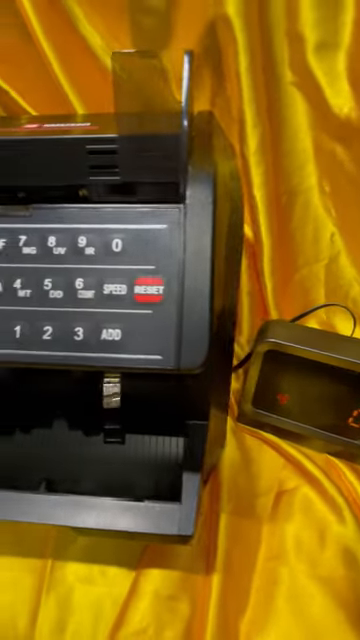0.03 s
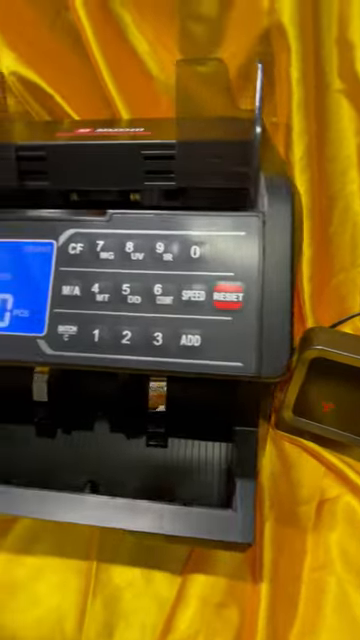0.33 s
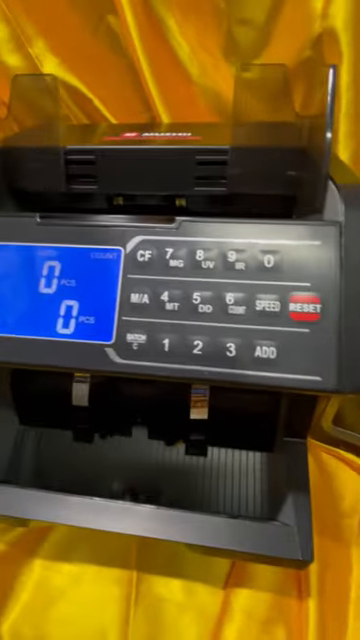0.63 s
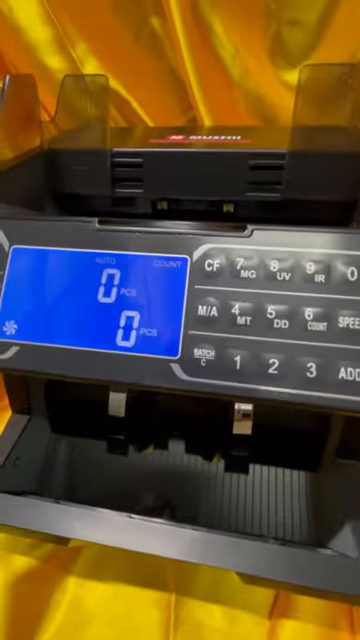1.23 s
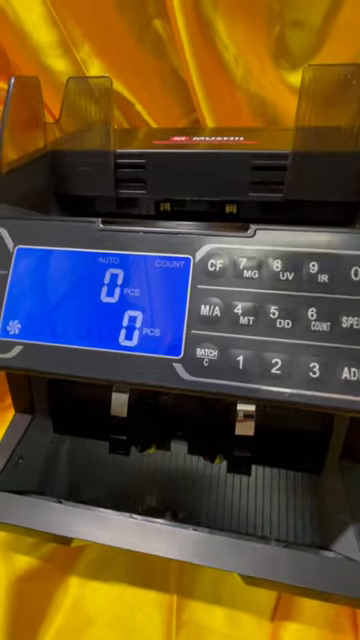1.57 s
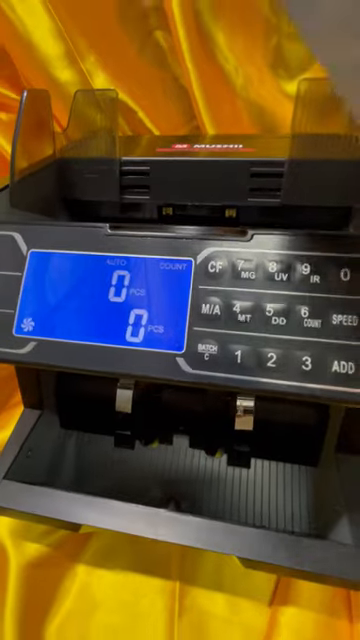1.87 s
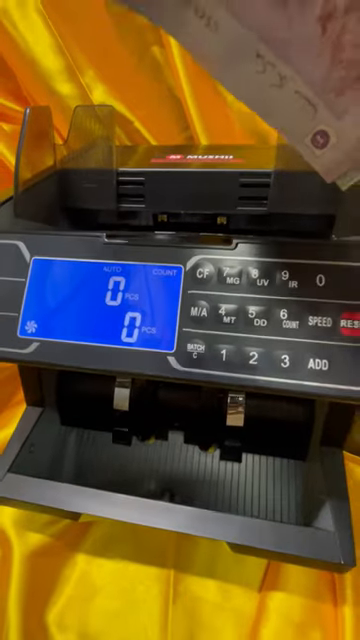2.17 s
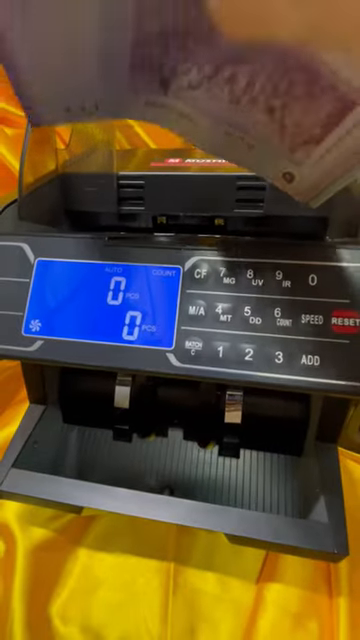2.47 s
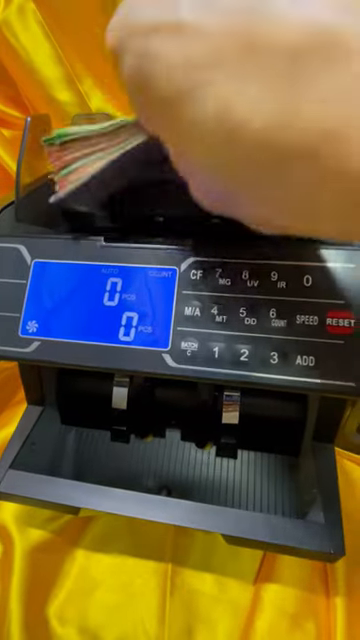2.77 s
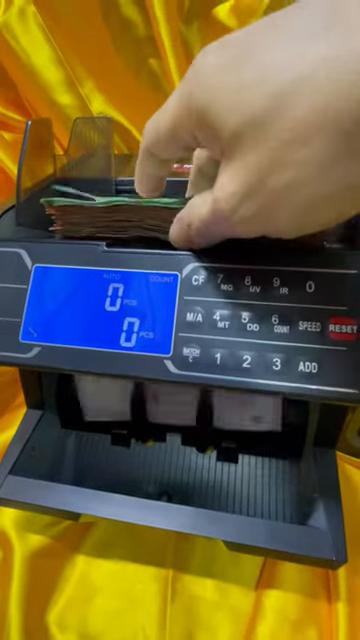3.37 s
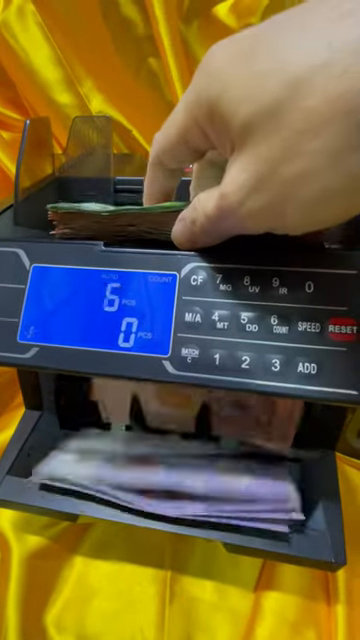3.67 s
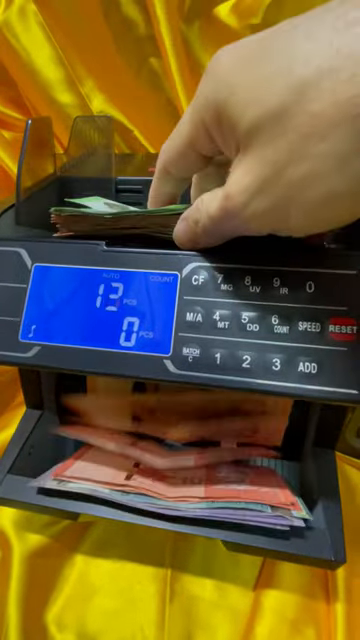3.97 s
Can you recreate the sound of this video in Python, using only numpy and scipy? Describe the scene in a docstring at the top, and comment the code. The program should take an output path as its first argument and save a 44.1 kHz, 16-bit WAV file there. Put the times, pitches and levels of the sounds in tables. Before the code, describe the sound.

A banknote counter is loaded and runs, heard close up. At first there is only a low room hum and faint handling swishes. From about 2.7 seconds a paper stack rustles in with light ticks and bumps. Rollers scrape at 3.2 seconds, then from 3.3 until the end at 4 the machine loudly riffles notes in rapid pulses, its motor whirring and plastic case rattling.

```python
"""A banknote counter plucks about 22 notes a second off a stack. Each note knocks in the plastic
case, rushes through the rollers and slaps into the tray, while the motor whirs and the case rattles.
The counting fills the last two thirds of a second. Before it come soft swishes of handling, then
the stack slides into the hopper and the rollers scrape it. The room is quiet, with a low hum.
Two close microphone openings, called ports, hear the machine as left and right."""
import sys
import numpy as np
from scipy import signal
from scipy.fft import rfft, irfft
from scipy.io import wavfile

SR = 44100
rng = np.random.default_rng(int(sys.argv[2]) if len(sys.argv) > 2 else 0)


def log_audio(samples):
    """Write samples as a 16-bit WAV file to the path given in sys.argv[1]."""
    # one column per channel
    frames = np.atleast_2d(samples).T
    # limit to full scale, then quantise
    limited = np.clip(frames, -1, 1)
    pcm = np.round(limited * 32767).astype(np.int16)
    wavfile.write(sys.argv[1], SR, pcm)


N = 176400
T, HZ = np.arange(N) / SR, np.fft.rfftfreq(N, 1 / SR)

# Notes plucked off the stack. Each row: start in seconds, relative level in dB, bass boost in dB,
# favoured pitch in Hz, contact time as a multiple of the usual.
PLUCKS = [(3.3445, -5, -4, 2000, 1.2), (3.3915, 4.5, 4, 740, .9), (3.4505, 3, -1, 800, 1.2),
          (3.503, 1.5, 1, 800, 1), (3.5505, 4, 0, 875, 1.4), (3.582, -3, -5, 1750, 1),
          (3.597, .5, 2, 840, .8), (3.6515, 1.5, -1, 650, 1), (3.711, -1.5, 0, 830, 1.6),
          (3.7555, 2, 3, 760, 1), (3.7945, .5, 0, 780, .9), (3.8365, .5, -2, 840, 1.1),
          (3.878, 0, -3, 1650, .9), (3.921, 2, -6, 865, 1.2), (3.978, -.5, -4, 850, 1)]
# How much louder the left port is than the right. Each row: frequency in Hz, difference in dB.
LEFT_GAIN = [(70, -3), (280, -4.5), (450, -1), (620, -12.5), (860, -10.5), (1100, -5), (1800, -5.5),
             (2300, -0.5), (4000, -7.5), (5200, 3.5), (6500, -1), (15000, 0)]
# How far the wave at the left port is ahead. Each row: frequency in Hz, lead in radians.
LEFT_LEAD = [(170, -0.1), (350, 0.02), (520, -2), (700, -3.5), (900, -6), (1200, -4), (1750, -6.5),
             (2800, -2), (4600, -2.5), (5900, -5), (7000, -4.5), (9000, -4.5), (11500, -2.5), (14300, 1.8)]


def case_knocks(blows):
    """Each blow pushes the plastic case for a few milliseconds, then its tones ring out."""
    # The case's tones. Each row: pitch in Hz, relative level in dB, time pushed in seconds,
    # seconds to fade by 60 dB, gain at the left port in dB.
    case_tones = [(285, -29, .005, .05, -4), (340, -31, .005, .03, -4), (450, -31, .005, .025, -6),
                  (610, -19.5, .003, .02, -12), (765, -18.5, .0045, .012, -17), (860, -15, .005, .012, -20),
                  (895, -26, .005, .05, -15), (1070, -25, .003, .02, -6), (1270, -24, .0015, .012, -9),
                  (1620, -18.5, .002, .01, -7), (1790, -20, .0025, .014, -7), (1980, -25, .002, .012, -5)]
    rise_s, detune, bass_below_hz = .0003, .012, 500
    favour_db, favour_width = 4, .08
    out, t = np.zeros((2, N)), T[:SR // 8]
    for start, db, bass_db, favoured_hz, contact in blows:
        for hz, tone_db, pushed_s, t60_s, left_db in case_tones:
            favour = np.exp(-(np.log(hz / favoured_hz) / favour_width) ** 2)
            boost_db = bass_db * (hz < bass_below_hz) + favour_db * favour
            fade_db = 60 * np.maximum(t - pushed_s * contact, 0) / t60_s
            level = np.minimum(t / rise_s, 1) * amp(db + tone_db + boost_db - fade_db)
            phase = 2 * np.pi * hz * (1 + detune * rng.standard_normal()) * t + rng.uniform(-1.18, 1)
            add(out, start, -level * stereo_tone(phase, hz, left_db))
    out = signal.lfilter(*signal.iirnotch(975, Q=9, fs=SR), out)  # the case barely rings at 975 Hz
    return signal.lfilter(*signal.butter(2, 140, "high", fs=SR), out)


def paper_rush():
    """Notes rush through the rollers, swelling at each pluck and echoing inside the paper path."""
    # The flow of paper. Each row: time in seconds, relative level in dB.
    flow = [(3.3, -65), (3.328, -17), (3.345, 2), (3.385, -1), (3.41, 3), (3.5, 0.5), (3.675, 2),
            (3.69, -5), (3.71, 3), (3.73, 1), (3.82, -0.5), (3.89, 1.5), (3.955, -3), (4, -1.5)]
    # The tone of the rush. Each row: frequency in Hz, level in dB per Hz.
    spectrum = [(100, -91), (400, -59.5), (880, -53.5), (975, -70), (1060, -56), (1350, -64), (1750, -58),
                (2150, -66), (2600, -59.5), (4400, -64.5), (5400, -62.5), (7000, -68.5), (9000, -69),
                (11000, -79.5), (13500, -71.5), (16000, -80.5)]
    level = loudness_curve(flow) * np.sqrt(gaps())
    swell = amp(-1) * pluck_pulses(decay_s=.024)
    hiss = grainy(flutter_db=1, flutter_hz=172, grain_db=1.5)
    rush = unit_level(hiss + amp(-2) * crinkles()) * level * np.hypot(1, swell)
    echo_gain = amp(-7)
    rush = rush + echo_gain * echoes(rush, t60_s=.032, rise_s=.00057)
    return ports(rush / np.hypot(1, echo_gain), spectrum)


def tray_slaps():
    """Notes slap into the tray, each a rough burst of noise with its own brief ring."""
    # Each row: time of the peak in seconds, relative level in dB, half-length in seconds, ring in Hz.
    slaps = [(3.346, 4, 0.0035, 2040), (3.377, 0.5, 0.011, 4900), (3.418, 5.5, 0.0025, 5700),
             (3.42, 2.5, 0.0032, 3240), (3.442, 5, 0.0027, 4970), (3.4655, 7, 0.0027, 6200),
             (3.482, 5.5, 0.0077, 3250), (3.536, 3, .004, 3550), (3.61, 3, 0.0025, 5780),
             (3.626, -1, .006, 3000), (3.658, 2.5, .003, 8000), (3.67, 5.5, 0.0027, 1760),
             (3.735, 5, 0.0036, 5100), (3.775, 0, .002, 2680), (3.812, -2, 0.0052, 5176),
             (3.85, -0.5, 0.0019, 2896), (3.869, 7, 0.0016, 5300), (3.9, 1, 0.0043, 2901)]
    # The tone all slaps share. Each row: frequency in Hz, level in dB per Hz.
    spectrum = [(50, -100), (200, -76), (1000, -71.5), (2000, -59), (3000, -62.5), (4400, -60),
                (5500, -64.5), (7000, -63), (9000, -73), (13000, -68), (16000, -82)]
    ring_db, ring_width_hz = 9, 940
    out, t = np.zeros((2, N)), T[:SR // 10]
    for peak_s, db, half_s, hz in slaps:
        noise = rng.standard_normal((2, len(t)))
        rough_level = amp(db - 5 + 3.05 * rng.standard_normal(len(t)))
        burst = noise * rough_level * np.exp(-.5 * ((t - t.mean()) / half_s) ** 2)
        ring = signal.lfilter(*signal.iirpeak(hz, hz / ring_width_hz, SR), burst)
        add(out, peak_s - t.mean(), burst + amp(ring_db) * ring)
    return ports(out, spectrum)


def motor_and_gears():
    """Rollers and gears rattle the case, hardest after each pluck, over the motor's wavering tones."""
    # The motor starts and runs. Each row: time in seconds, relative level in dB.
    run_levels = [(3.13, -57), (3.18, -37), (3.3, -22), (3.345, 0), (3.675, 4.5), (3.69, -15), (3.72, 3)]
    # The tone of the rattle. Each row: frequency in Hz, level in dB per Hz.
    rattle_spectrum = [(25, -105), (60, -84), (130, -73), (185, -58), (240, -56), (320, -53), (380, -56.5),
                       (480, -59.5), (600, -54), (700, -56), (870, -53), (980, -66), (1100, -58),
                       (1400, -70), (1800, -58), (2100, -72), (5000, -90)]
    # The motor's tones. Each row: pitch in Hz, relative level in dB.
    motor_tones = [(184, -45), (440, -40), (673, -32.5)]
    running = loudness_curve(run_levels) * gaps()
    jolts = pluck_pulses(decay_s=.016, delay_s=.0039)
    chatter = grainy(flutter_db=3, flutter_hz=200, grain_db=3)
    out = ports(amp(-4) * chatter * np.hypot(running, jolts), rattle_spectrum)
    speed = 1 + .00525 * drift(16.9)
    phase_per_hz = 2 * np.pi * np.cumsum(speed) / SR
    for hz, db in motor_tones:
        tone = stereo_tone(hz * phase_per_hz, hz, look_up(LEFT_GAIN, hz))
        out += tone * running * amp(db + 2.7 * drift(47))
    return out


def roller_drone():
    """The feed roller makes a rough, gliding tone, higher while it drags on the notes."""
    # Each row: time in seconds, pitch in Hz, level in dB.
    glide = [(3.171, 285.2, -74), (3.23, 246.4, -44.5), (3.3, 245.1, -40.5), (3.37, 273.7, -32),
             (3.46, 303.4, -28), (3.551, 305.5, -31), (3.6, 278.8, -27.5), (3.66, 280, -41),
             (3.728, 238, -31), (3.83, 242.7, -27), (3.87, 281.2, -27), (3.95, 279.6, -32), (4, 255, -32)]
    times, pitches, db = np.transpose(glide)
    hz = np.interp(T, times, pitches)
    phase = 2 * np.pi * np.cumsum(hz) / SR + .35 * drift(45)
    level = amp(np.interp(T, times, db, left=-140) + 1.05 * drift(40))
    return level * stereo_tone(phase, hz, look_up(LEFT_GAIN, hz))


def roller_scrape():
    """Rubber rollers slip on the bottom note before they grip it."""
    # Each row: time in seconds, relative level in dB.
    levels = [(3.14, -22), (3.18, -7), (3.25, -5.5), (3.33, -14), (3.36, -25)]
    # The tone of the scrape. Each row: frequency in Hz, level in dB per Hz.
    spectrum = [(600, -100), (830, -85), (1000, -77), (1250, -75), (1450, -102), (1720, -63), (1900, -82),
                (2300, -100)]
    friction = grainy(flutter_db=2, flutter_hz=150, grain_db=5.5)
    return ports(loudness_curve(levels, after_db=-140) * friction, spectrum)


def edge_ticks():
    """The edges of the notes tick on the plastic."""
    # Each row: start in seconds, relative level in dB, fade time in seconds.
    ticks = [(2.183, -24.5, 0.0018), (2.7919, -14, .004), (2.8214, -7, 0.0055), (2.8333, 5, 0.0023),
             (3.0463, -13, 0.0039), (3.096, -6.5, 0.0024), (3.271, -5.5, 0.0055)]
    # The tone of a tick. Each row: frequency in Hz, level in dB per Hz.
    spectrum = [(300, -70.5), (1500, -88), (3000, -74), (16000, -85.5)]
    level = sum(amp(db) * fading(start, decay_s) for start, db, decay_s in ticks)
    return ports(level * rng.standard_normal((2, N)), spectrum)


def stack_slide():
    """The stack rubs and rustles its way into the hopper."""
    # Each row: time in seconds, then the relative levels of treble, middle and bass in dB.
    slide = [(2.7, -107, -99, -75), (2.74, -99, -95, -86), (2.751, -73, -60, -48.5),
             (2.797, -60.5, -56, -62), (2.815, -67, -60, -53), (2.828, -53.5, -48, -41),
             (2.858, -60, -54, -46.5), (2.886, -52.5, -50, -52), (2.922, -77, -60.5, -51),
             (2.972, -60, -59, -61), (2.996, -65, -53.5, -44.5), (3.089, -65.5, -59, -53.5),
             (3.098, -51, -42, -48), (3.117, -71.5, -63.5, -59.5), (3.2, -59, -48.5, -45.5),
             (3.32, -59.5, -50, -45.5)]
    # The tone of those three bands. Each row: frequency in Hz, level in dB per Hz.
    treble = [(800, -104), (2200, -28), (4000, -29.5), (9500, -45), (16000, -55)]
    middle = [(250, -63), (500, -24.5), (1100, -26), (2400, -39.5), (5000, -65)]
    bass = [(40, -55), (270, -21.5), (350, -25.5), (900, -60)]
    times, *band_levels = np.transpose(slide)
    out = np.zeros((2, N))
    for db, spectrum in zip(band_levels, (treble, middle, bass)):
        rubbing = grainy(flutter_db=1, flutter_hz=115, grain_db=1)
        rustle = unit_level(rubbing + amp(-1) * crinkles())
        out += ports(amp(np.interp(T, times, db, left=-140)) * rustle, spectrum)
    return out


def loading_knocks():
    """Soft knocks on the case while the stack is loaded, the last one from a finger tapping it."""
    # Each row: start in seconds, relative level in dB, bass boost in dB, favoured pitch in Hz,
    # contact time as a multiple of the usual.
    knocks = [(2.752, -45.5, 21.5, 300, 1), (2.829, -37.5, 22.5, 340, 1), (3.096, -27.5, 0, 840, 1)]
    return case_knocks(knocks)


def handling_swishes():
    """Faint swells of noise as things are moved about."""
    # Each row: time of the peak and half-length in seconds, level in dB, low and high edge in Hz.
    swishes = [(.29, 0.23, -88, 3000, 4640), (1.042, 0.12, -73, 445, 1210), (2.015, 0.062, -84, 900, 1950),
               (2.484, .11, -71.5, 298, 1600)]
    out = np.zeros((2, N))
    for peak_s, half_s, db, low_hz, high_hz in swishes:
        band = 1 / np.sqrt((1 + (HZ / high_hz) ** 14) * (1 + (low_hz / (HZ + 1)) ** 8))
        noise = unit_level(irfft(rfft(rng.standard_normal((3, N))) * band, N))
        pair = (noise[:2] + noise[2]) / np.sqrt(2)  # both sides share the third noise
        out += pair * amp(db) * np.exp(-((T - peak_s) / half_s) ** 2)
    return out


def room():
    """Low rumble, faint hiss and a wavering hum."""
    # The rumble and hiss. Each row: frequency in Hz, level in dB per Hz.
    spectrum = [(20, -108), (68, -65.5), (135, -91), (200, -91), (320, -103), (600, -106), (2000, -124),
                (16000, -136)]
    # How alike the two sides are. Each row: frequency in Hz, likeness from 0 to 1.
    likeness = [(100, .993), (300, .85), (800, .5), (3000, .3), (16000, .2)]
    right, other = rfft(rng.standard_normal((2, N))) * amp(look_up(spectrum)) * np.sqrt(SR / 2)
    left = blend(right, other, look_up(likeness))
    hum_hz, hum_db = 70.3, -52
    hum = amp(hum_db + 3 * drift(3)) * np.sin(2 * np.pi * hum_hz * T + .6 * drift(2))
    return irfft(np.array([left, right]), N) + hum


def gaps(dip_db=-5, early_s=.005, half_s=.006):
    """The machine is quieter between notes, just before each pluck."""
    dips = sum(np.exp(-((T - start + early_s) / half_s) ** 2) for start, *_ in PLUCKS)
    return amp(dip_db * dips)


def pluck_pulses(decay_s, delay_s=0):
    """A level that jumps with each pluck and dies away."""
    return sum(amp(db) * fading(start + delay_s, decay_s) for start, db, *_ in PLUCKS)


def crinkles(per_second=420, spread_db=4.5, decay_s=.0005):
    """Scattered tiny snaps of creasing paper, a few of them large."""
    sizes = amp(spread_db * np.minimum(rng.exponential(1, N), 3))
    snaps = sizes * (rng.random(N) < per_second / SR)
    level = signal.lfilter([1], [1, -np.exp(-1 / (decay_s * SR))], snaps)
    return unit_level(level * rng.standard_normal((2, N)))


def grainy(flutter_db, flutter_hz, grain_db):
    """Two noises that share one flutter and one fine crackle."""
    noise = rng.standard_normal((2, N))
    return unit_level(noise * amp(flutter_db * drift(flutter_hz) + grain_db * drift(1450)))


def ports(pair, spectrum):
    """Shapes the tone of two noises and sends them to the left and right ports."""
    # How alike the two ports sound. Each row: frequency in Hz, likeness from 0 to 1.
    likeness = [(330, .99), (950, .4), (1700, .88), (2600, .3), (9000, .85), (15000, .85)]
    size = N + SR // 5
    hz = np.fft.rfftfreq(size, 1 / SR)
    # Build a filter that rings only after a sound, never before it.
    cepstrum = irfft(np.log(amp(look_up(spectrum, hz))), size)[:size // 2]
    colour = np.exp(2 * rfft(cepstrum, size) - cepstrum[0])
    right, other = rfft(pair, size) * colour * np.sqrt(SR / 2)
    left = blend(right, other, look_up(likeness, hz))
    left *= amp(look_up(LEFT_GAIN, hz)) * np.exp(1j * look_up(LEFT_LEAD, hz))
    return irfft(np.array([left, right]), size)[:, :N]


def stereo_tone(phase, hz, left_db):
    """A pure tone that reaches the left port with its own level and timing."""
    return np.array([amp(left_db) * np.sin(phase + look_up(LEFT_LEAD, hz)), np.sin(phase)])


def echoes(x, t60_s, rise_s):
    """A wash of reflections that fades by 60 dB in t60_s seconds."""
    t = T[:SR // 2]
    tail = rng.standard_normal((2, len(t))) * np.minimum(t / rise_s, 1) * amp(-60 * t / t60_s)
    tail /= np.linalg.norm(tail, axis=1)[:, None]
    return signal.fftconvolve(x, tail, axes=1)[:, :N]


def blend(noise, other, likeness):
    """Mixes two noises at steady power; a likeness of 1 gives only the first."""
    return likeness * noise + np.sqrt(1 - likeness ** 2) * other


def drift(hz):
    """A random wobble of typical size 1, up to about the given rate."""
    return unit_level(irfft(rfft(rng.standard_normal(N)) * np.exp(-(HZ / hz) ** 2), N))


def fading(start, decay_s):
    """A jump to 1 that dies away."""
    return (T >= start) * np.exp(-abs(T - start) / decay_s)


def loudness_curve(points, after_db=None):
    """Joins rows of seconds and dB into a gain, silent before the first row."""
    return amp(np.interp(T, *np.transpose(points), left=-140, right=after_db))


def look_up(points, hz=HZ):
    """Reads between a table's rows, giving each octave equal room."""
    row_hz, values = np.transpose(points)
    return np.interp(np.log(hz + 1), np.log(row_hz + 1), values)


def amp(db):
    """Turns decibels into a gain."""
    return 10 ** (np.asarray(db) / 20)


def unit_level(x):
    """Scales a signal to an average power of 1."""
    return x / np.sqrt(np.mean(x ** 2) + 1e-20)


def add(mix, start, sound):
    """Adds a stereo sound at a start time in seconds."""
    part = mix[:, round(start * SR):][:, :sound.shape[1]]
    part += sound[:, :part.shape[1]]


def scene():
    """The stack is loaded and counted, and the walls echo it softly."""
    loading = edge_ticks() + stack_slide() + loading_knocks()
    counting = roller_scrape() + case_knocks(PLUCKS) + paper_rush() + tray_slaps()
    machine = loading + counting + motor_and_gears() + roller_drone()
    walls = amp(-14) * echoes(machine, t60_s=.34, rise_s=.0038)
    return machine + walls + handling_swishes() + room()


def record(dry):
    """Cuts away the treble above 15900 Hz."""
    low_pass = signal.firwin(511, 15900, window=("kaiser", 9), fs=SR)
    return signal.oaconvolve(dry, low_pass[None], "same")


dry = scene()
out = record(dry)
log_audio(out)
```